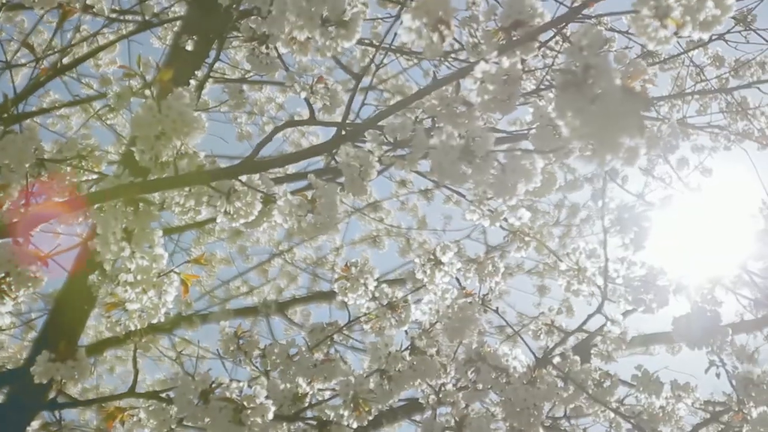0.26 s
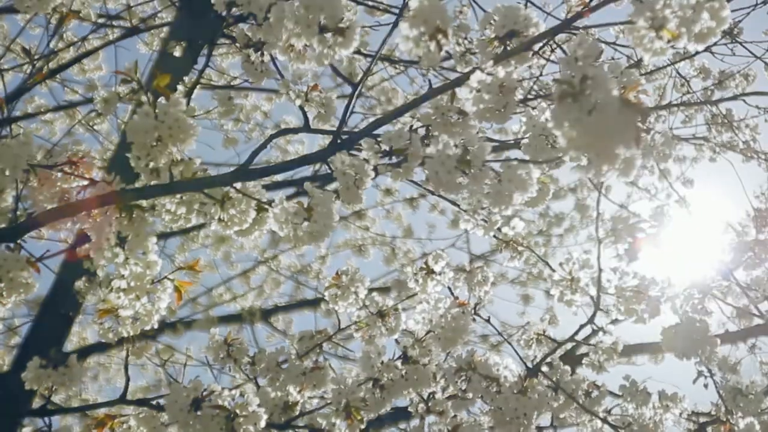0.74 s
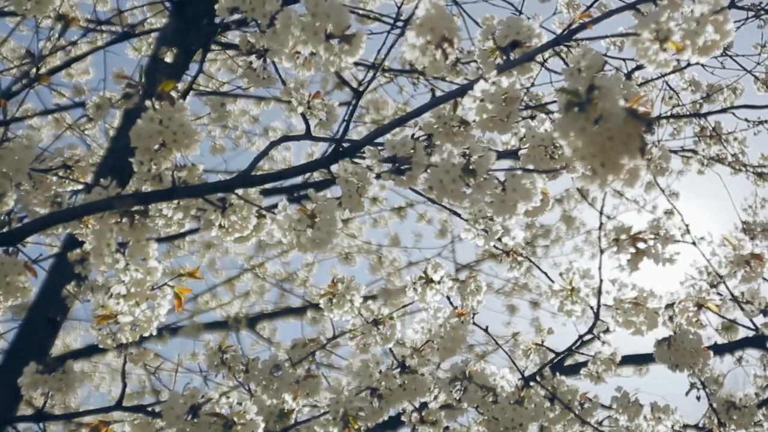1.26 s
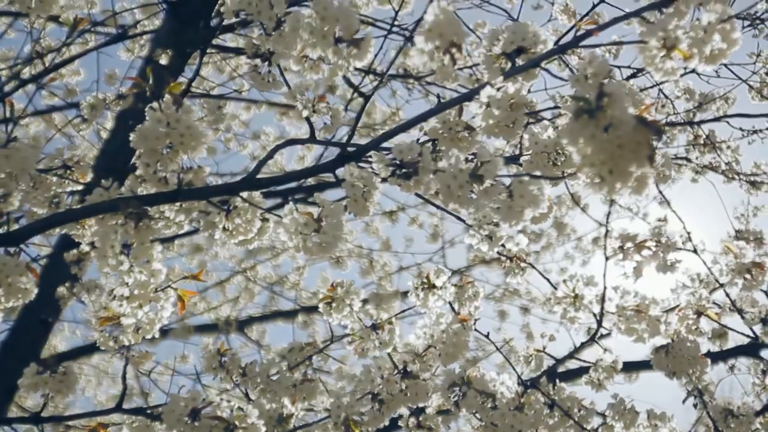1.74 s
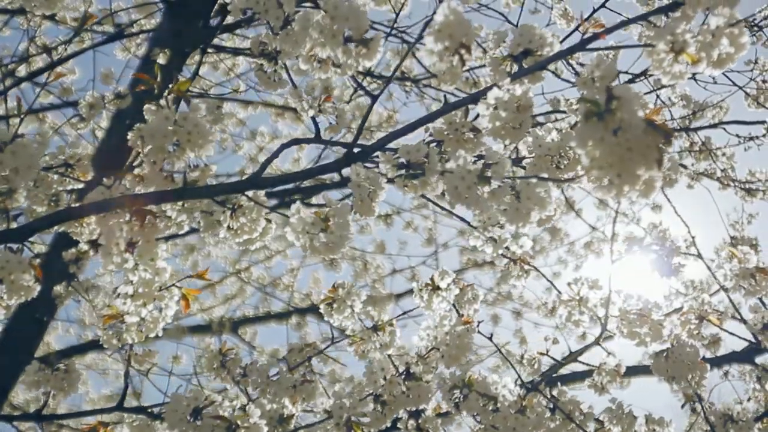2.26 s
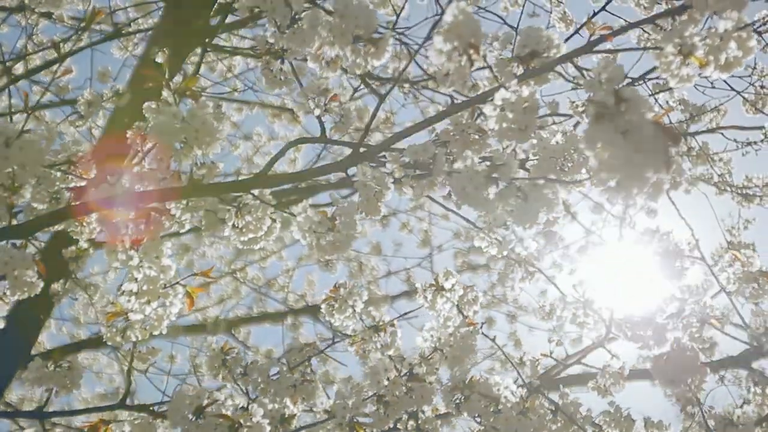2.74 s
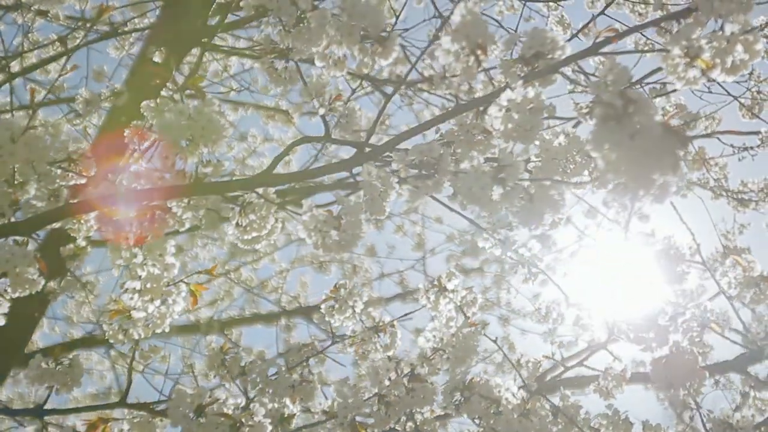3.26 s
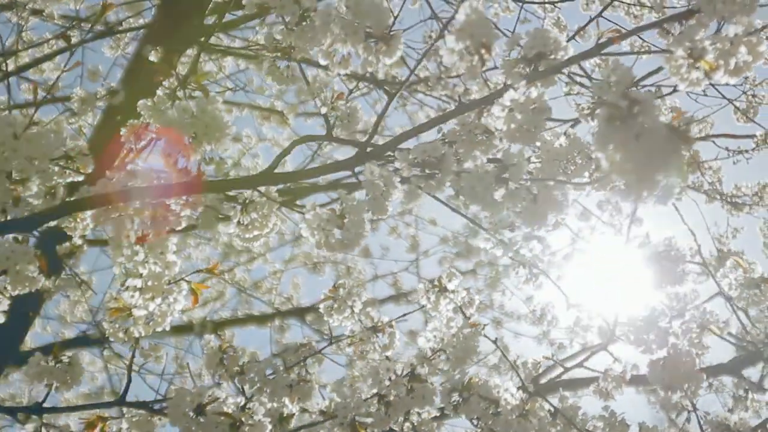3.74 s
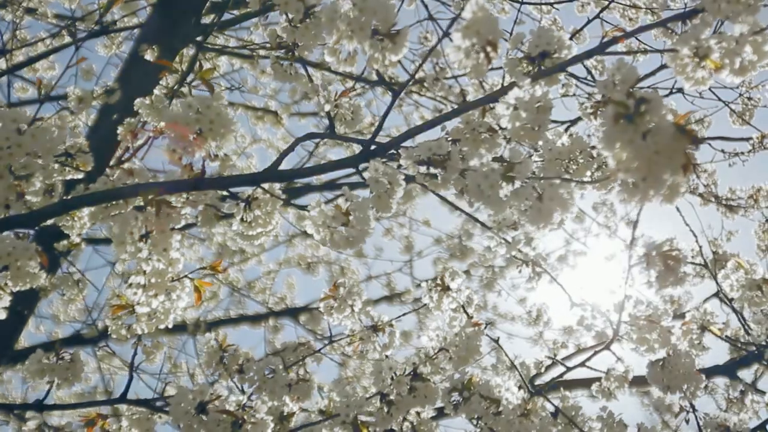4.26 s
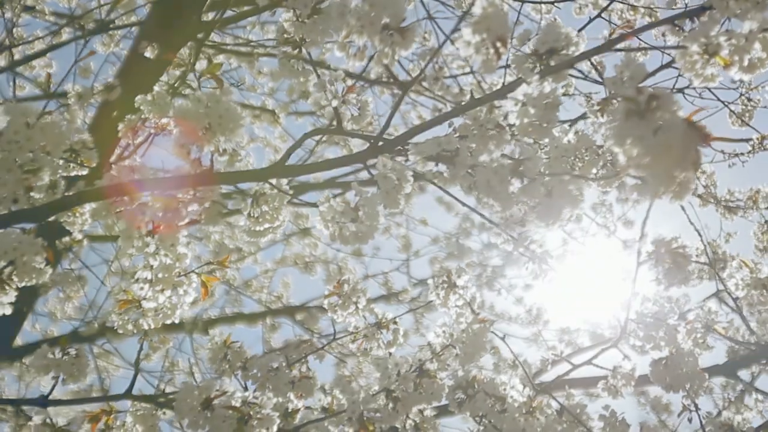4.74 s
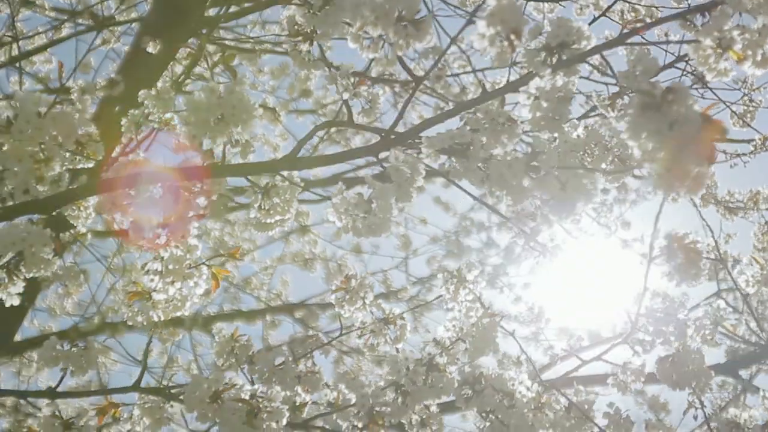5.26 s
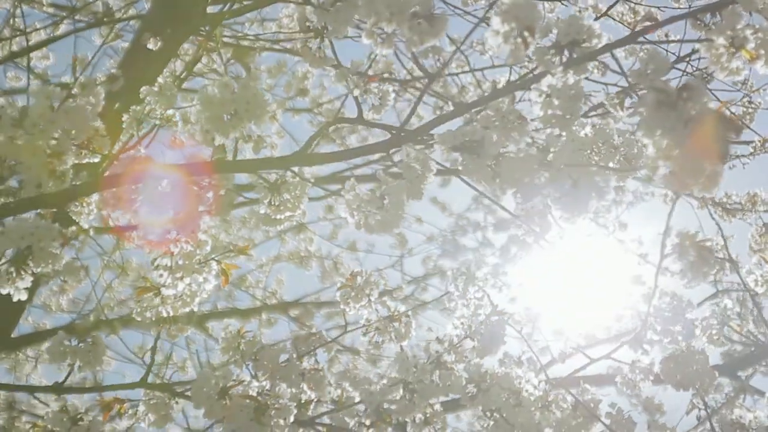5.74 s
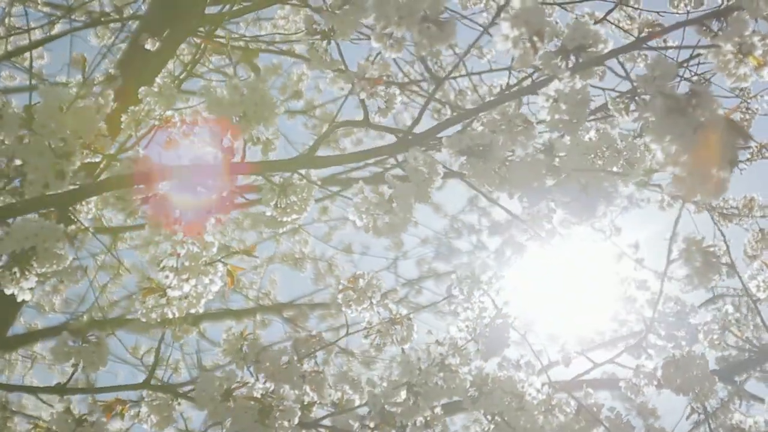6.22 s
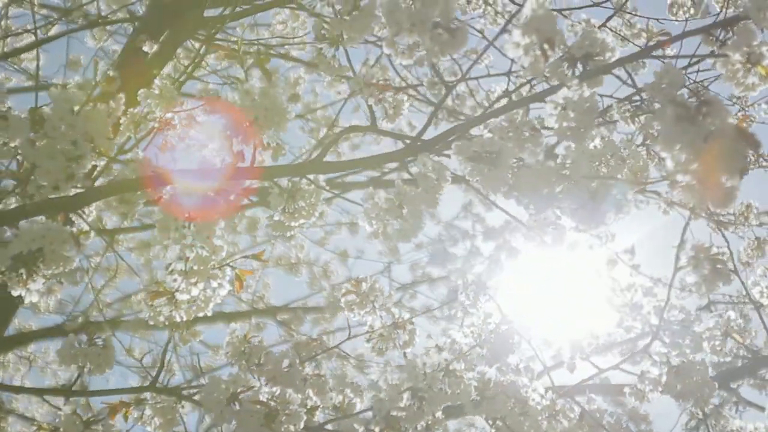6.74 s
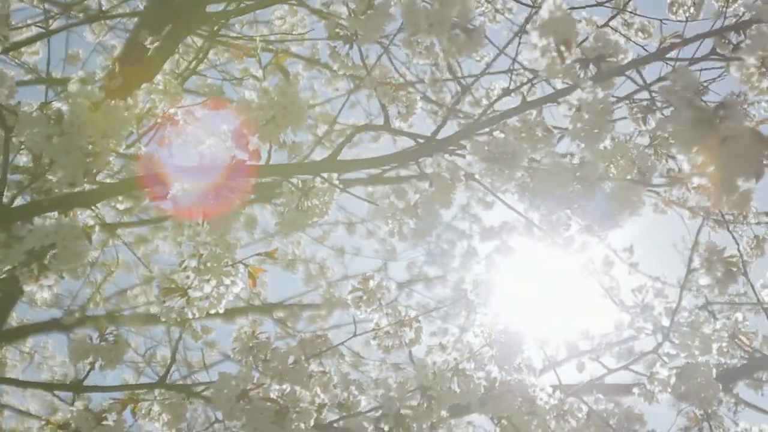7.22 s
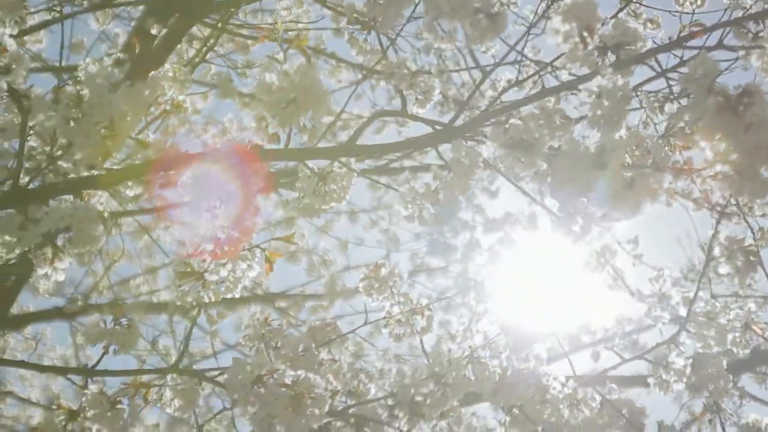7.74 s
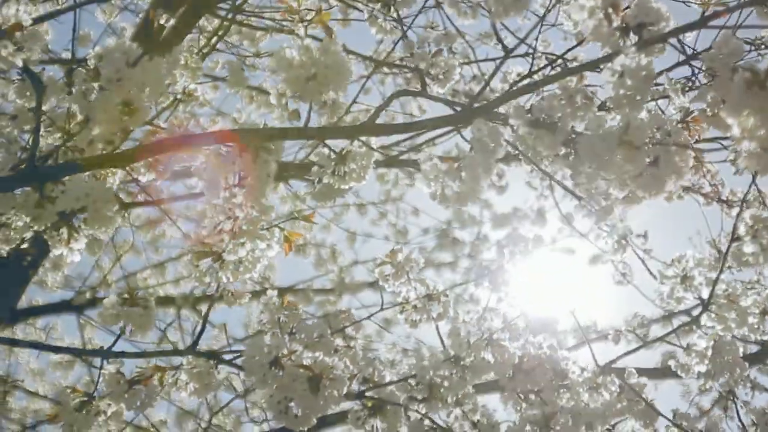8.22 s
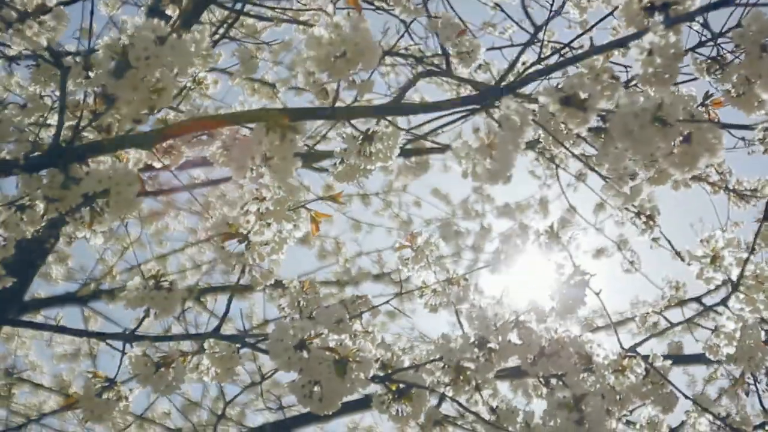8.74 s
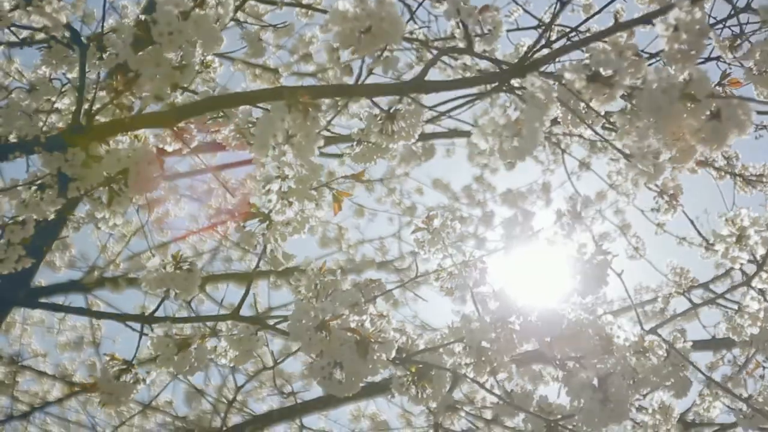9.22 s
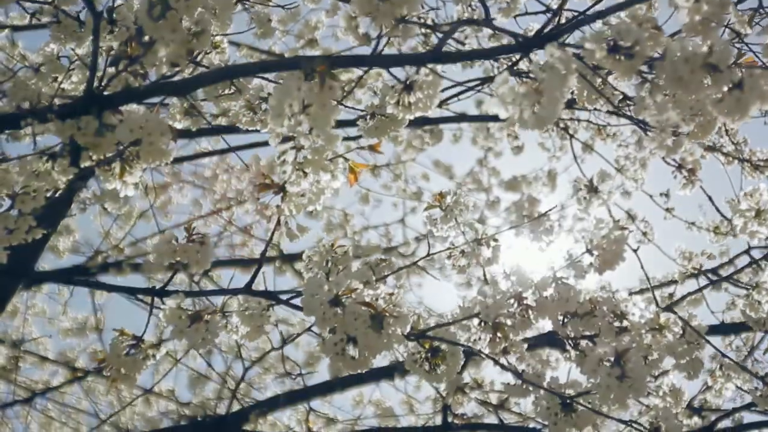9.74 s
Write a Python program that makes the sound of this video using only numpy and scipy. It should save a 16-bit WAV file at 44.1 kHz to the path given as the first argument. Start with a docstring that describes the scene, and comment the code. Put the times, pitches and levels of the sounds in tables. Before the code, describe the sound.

A nearby blackbird sings a fluted, warbling phrase while a tit and a sparrow call in a yard over a faint breeze.

```python
"""A yard between house walls, heard from a stereo microphone pair. In a nearby tree a blackbird sings
a fluted phrase with warbles, high twitter and a buzzy trill from both halves of its syrinx.
A tit repeats its two-note song, a sparrow chirps on the left, fainter songbirds answer further off.
Walls and foliage echo the whistled notes and two taps of a twig, over the noise of distant traffic
and a breeze in the leaves."""
import sys
import numpy as np
from scipy import signal
from scipy.fft import rfft, irfft, next_fast_len
from scipy.io import wavfile
from scipy.ndimage import uniform_filter1d

SR = 44100
rng = np.random.default_rng(int(sys.argv[2]) if len(sys.argv) > 2 else 0)


def transcribe(signal):
    """Save signal, clipped to [-1, 1], as a 16-bit WAV file at the path in sys.argv[1]."""
    frames = np.atleast_2d(signal).T
    limited = np.clip(frames, -1, 1)
    pcm = np.round(limited * 32767).astype(np.int16)
    wavfile.write(sys.argv[1], SR, pcm)


N = 440118
TOP_HZ = 15050


def undb(db):
    return 10 ** (np.asarray(db) / 20)


def span(start, length):
    return np.arange(int(start * SR), int((start + length) * SR)) / SR


def curve(points):
    """Straight lines through (t/s, value) points, over the whole scene."""
    return np.interp(np.arange(N) / SR, *np.transpose(points))


def walk(rate_hz):
    """Random values held for 1 / rate_hz and smoothed twice; spread near 1."""
    hold = int(SR / rate_hz)
    steps = np.repeat(rng.standard_normal(N // 256)[:N // hold + 1], hold)
    return 1.3 * uniform_filter1d(uniform_filter1d(steps, hold), hold)[:N]


RASP_HZ = 400
def add_whistle(out, t, hz, db, edge_s, overtones_db=()):
    """One tone of a syrinx, added at times t: a clean fundamental, raspy overtones, soft ends."""
    phase = 2 * np.pi * (np.cumsum(hz) / SR + rng.random())
    grain = int(SR / RASP_HZ)
    tone = np.sin(phase)
    for n, overtone_db in enumerate(overtones_db, start=2):
        noise = rng.standard_normal(SR * 6 // 10)[:len(t)]
        rasp = uniform_filter1d(.5 + np.sqrt(grain) * uniform_filter1d(noise, grain), grain // 2)
        top_fade = np.clip((TOP_HZ - n * hz) / 1500, 0, 1)
        tone += undb(overtone_db) * rasp * np.sin(n * phase) * top_fade
    ends = np.clip(np.minimum(t - t[0], t[-1] - t) / edge_s, 0, 1)
    at = np.round(t * SR).astype(int)
    inside = (at >= 0) & (at < N)
    out[at[inside]] += (tone * undb(db) * ends)[inside]


# Throat resonances that lift the overtones: f/Hz, width/Hz, lift/dB
THROAT = [(3300, 250, 14), (10700, 1000, 11), (12800, 700, 8)]
WAVER_SHARE, WAVER_DB, WAVER_HZ = .006, 2.2, 70  # held notes are never quite steady
MUSCLE_S, FULL_VOICE_DB = .005, -20
def sing(notes, events=((0, 0),), overtones_db=(), bend=None, retune=0., strain=0.):
    """A bird sings notes (t/s, f/Hz, level/dB) at each event (t/s, gain/dB); muscles round the turns."""
    out, waver, flutter = np.zeros(N), walk(WAVER_HZ), walk(WAVER_HZ)
    tunings = 1 + retune * rng.standard_normal(len(events))
    for (start, gain_db), tuning in zip(events, tunings):
        for note in notes:
            times, hz, db = np.transpose(note)
            length = times[-1] - times[0]
            t = span(start + times[0], length)
            now = np.clip((t * SR).astype(int), 0, N - 1)
            swing_hz, dip_db = bend(t) if bend else (0, 0)
            rounding = min(len(t) // 20, int(MUSCLE_S * SR)) + 1
            pitch = uniform_filter1d(np.interp(t - start, times, hz), rounding, mode="nearest")
            pitch = pitch * tuning * (1 + WAVER_SHARE * waver[now]) + swing_hz
            level_db = gain_db + dip_db + np.interp(t - start, times, db) + WAVER_DB * flutter[now]
            effort_db = strain * (level_db - FULL_VOICE_DB)  # under strain, louder is brighter
            voiced_db = []
            for n, overtone_db in enumerate(overtones_db, start=2):
                lift_db = sum(lift * np.exp(-((n * pitch - f) / width) ** 2) for f, width, lift in THROAT)
                voiced_db.append(overtone_db + effort_db + lift_db)
            add_whistle(out, t, pitch, level_db, edge_s=.002 + .015 * length, overtones_db=voiced_db)
    return out


# Distant traffic and leaves all round the microphones: f/Hz, relative spectral level/dB
AIR_SPECTRUM = [(18, -44), (30, -29), (64, -21), (125, -15.5), (205, -9), (300, -4), (600, -2.5),
                (900, -2.5), (1300, -7), (2200, -12.5), (5000, -17.5), (13500, -24.5), (15000, -33)]
# How alike the two microphones hear them: f/Hz, correlation from -1 to 1
AIR_LIKENESS = [(30, .55), (70, .93), (130, .99), (290, .992), (640, .87), (1400, .5), (3090, -.08),
                (6790, -.22), (14900, -.12)]
# The breeze lifts the leaf hiss: t/s, gain/dB
BREEZE = [(0, 1), (1.5, 0), (3, 0), (5, 1), (7, 0), (8.4, 0), (8.9, 3), (9.4, 2), (9.98, 1)]
# The traffic swells in the deep bass: t/s, gain/dB
TRAFFIC_SWELLS = [(0, 0), (3.5, 0), (4.5, 4), (6, 4), (6.6, -1), (8.2, -2), (8.8, 3), (9.4, 0), (9.98, 0)]
AIR_DB, LEAVES_FROM_HZ, RUMBLE_BELOW_HZ = -55.5, 2500, 110
def traffic_and_leaves():
    """Two-octave bands of noise that swell together and flicker alone; alike on both sides in the bass."""
    size = next_fast_len(N)
    hz = np.maximum(np.fft.rfftfreq(size, 1 / SR), 1)
    likeness, colour_db = (np.interp(np.log(hz), np.log(f), value)
                           for f, value in map(np.transpose, (AIR_LIKENESS, AIR_SPECTRUM)))
    mid, side = rfft(rng.standard_normal((2, size))) * undb(colour_db) * np.sqrt([1 + likeness, 1 - likeness])
    pair = np.array([mid + side, mid - side])
    gust_db, rumble_db, swell_db = curve(BREEZE), curve(TRAFFIC_SWELLS), .48 * walk(.5)
    out = 0
    for centre_hz in 20 * 4 ** np.arange(6):
        share = np.cos(np.pi / 2 * np.clip(np.log2(hz / centre_hz) / 2, -1, 1)) ** 2
        band = irfft(pair * share, size)[:, :N]
        leafy = min(centre_hz / LEAVES_FROM_HZ, 1)
        deep = min(RUMBLE_BELOW_HZ / centre_hz, 1) ** 2
        out = out + band * undb(swell_db + walk(2.97) + leafy * gust_db + deep * rumble_db)
    return out * undb(AIR_DB) / np.sqrt(np.mean(irfft(mid, size) ** 2))


# A faint drone, far off: t/s, level/dB
DRONE_LEVELS = [(0, -68), (.3, -72), (.7, -66), (1.1, -68), (1.5, -85)]
def drone(centre_hz=1350, width_hz=250):
    """A narrow band of noise that soon sinks to almost nothing."""
    edges = [centre_hz - width_hz / 2, centre_hz + width_hz / 2]
    band = signal.butter(2, edges, "band", fs=SR, output="sos")
    hum = signal.sosfilt(band, rng.standard_normal(N))
    return hum / hum.std() * undb(curve(DRONE_LEVELS))


# A neighbouring bird's blips, low rise and slide, one list a note: t/s into the call, f/Hz, level/dB
CHATTER_NOTES = [
    [(-.001, 4150, -1), (.003, 4800, 5), (.006, 5550, -2)],
    [(.008, 4900, -6), (.014, 5100, 0), (.024, 5200, -10)],
    [(.012, 2000, -8), (.018, 2550, -5), (.028, 2780, -4), (.036, 2800, -8)],
    [(.033, 7450, -8), (.039, 7050, -4), (.044, 6100, 3), (.05, 5150, -3), (.054, 4900, -7)],
]
# Its calls: t/s, gain/dB
CHATTER_CALLS = [(-.041, -40), (.056, -39), (.153, -38.5)]
def chatter():
    """Three quick calls of overlapping whistles, ending just after the scene opens."""
    return sing(CHATTER_NOTES, CHATTER_CALLS, overtones_db=[-31])


CHIRP_FROM_HZ, KINK_HZ, LEAD_IN_S = 3450, 3550, .013
def chirp(t, db, rise_s, top_hz, kink_db):
    """A sparrow's note: faint lead-in, sudden loud upward sweep, then a drop and a second quick rise."""
    return [(t - rise_s - LEAD_IN_S, CHIRP_FROM_HZ, db - 24),
            (t - rise_s, CHIRP_FROM_HZ + 50, db - 16), (t - .8 * rise_s, CHIRP_FROM_HZ + 150, db - 8),
            (t - .35 * rise_s, .92 * top_hz, db), (t, top_hz, db - 4),
            (t + .004, KINK_HZ, db + kink_db), (t + .009, .93 * top_hz, db + kink_db),
            (t + .014, 1.04 * top_hz, db + kink_db - 8)]


# Sparrow chirps: top of the sweep t/s, level/dB, sweep length/s, top f/Hz, relative kink level/dB
SPARROW_CHIRPS = [(0.084, -39, .03, 4200, -6), (.69, -70, .025, 4350, -6), (.977, -30.5, .027, 4400, -8),
                  (1.118, -31, .022, 4400, -4), (1.945, -68, .025, 4350, -6), (2.581, -42, .025, 4350, -6),
                  (2.717, -30.5, .024, 4400, -6), (3.209, -64, .025, 4350, -6),
                  (4.129, -29.5, .022, 4450, -6), (4.258, -24, .028, 4450, -5),
                  (5.595, -50, .025, 4350, -6), (5.765, -27.5, .026, 4350, -6),
                  (5.888, -25, .024, 4350, -6), (6.85, -62, .025, 4350, -6), (7.0, -66, .025, 4350, -6),
                  (8.527, -30.5, .032, 4500, -4), (8.662, -32, .029, 4350, -2),
                  (9.495, -63, .025, 4350, -6), (9.622, -36, .025, 4350, -6)]
# One drawn-out call, left of the microphones: t/s, f/Hz, level/dB
SPARROW_LONG_CALL = [
    [(7.035, 2910, -61), (7.065, 2736, -50.5), (7.12, 2924, -47), (7.165, 3000, -46), (7.18, 2990, -36.5),
     (7.215, 3430, -26.5), (7.24, 4195, -23.5), (7.25, 4230, -30)],
]
DISTANT_BELOW_DB = -55  # fainter chirps come from behind the trees
def sparrows():
    """Swept whistles as two signals: the near chirps with the long call, and the distant chirps."""
    near = sing([chirp(*row) for row in SPARROW_CHIRPS if row[1] > DISTANT_BELOW_DB])
    distant = sing([chirp(*row) for row in SPARROW_CHIRPS if row[1] <= DISTANT_BELOW_DB])
    return near + sing(SPARROW_LONG_CALL, overtones_db=[-46, -38]), distant


# Songbirds far from the microphones; all levels are before FAR_DB.
# Plain whistles: t/s, length/s, start f/Hz, end f/Hz, level/dB
FAR_WHISTLES = [(1.64, .07, 2220, 2200, -64), (1.74, .1, 2600, 2460, -67), (7.26, .06, 4900, 5050, -60),
                (9.378, .024, 3320, 2980, -54), (9.61, .055, 2850, 3350, -62)]
# Stepped rises: middle step t/s, low step length/s, low f/Hz, middle f/Hz, top f/Hz, level/dB
FAR_STAIRS = [(7.645, .02, 3920, 4960, 5720, -49), (7.9, .045, 3330, 4530, 5300, -49)]
# Arched whistles: crest t/s, start f/Hz, crest f/Hz, end f/Hz, fall length/s, level/dB
FAR_ARCHES = [(8.065, 3730, 4140, 2610, .085, -52), (8.27, 3300, 4070, 3070, .07, -50),
              (8.455, 3250, 3980, 3090, .065, -51)]
# A two-note motif and a scooped one, one list a note: t/s into the motif, f/Hz, level/dB
PAIR_NOTES = [
    [(0, 4860, -8), (.03, 5230, 0)],
    [(.065, 4550, 0), (.09, 3900, -1)],
]
SCOOP_NOTES = [
    [(0, 2850, -7), (.04, 2630, -3), (.06, 2750, -10), (.075, 3220, -2), (.095, 3320, -3)],
]
# Their calls: t/s, gain/dB
PAIR_CALLS = [(7.03, -60), (7.41, -51)]
SCOOP_CALLS = [(8.76, -59), (8.905, -57), (9.05, -57), (9.205, -58)]
FAR_DB, STAIR_JUMP_S, STAIR_HOLD_S, ARCH_RISE_S = -1, .021, .024, .033
def far_birds():
    """Pure whistles without overtones: stepped rises, arches, plain glides and repeated motifs."""
    notes = [[(t - STAIR_JUMP_S - low_s, 1.03 * low, db - 8), (t - STAIR_JUMP_S, low, db - 2),
              (t, mid, db), (t + STAIR_HOLD_S, mid, db - 3),
              (t + STAIR_HOLD_S + STAIR_JUMP_S, top, db - 10)]
             for t, low_s, low, mid, top, db in FAR_STAIRS]
    arc = np.linspace(-1, 1, 9)  # 0 at the crest
    for t, start_hz, crest_hz, end_hz, fall_s, db in FAR_ARCHES:
        times = t + arc * np.where(arc < 0, ARCH_RISE_S, fall_s)
        hz = crest_hz - np.abs(arc) ** 1.6 * (crest_hz - np.where(arc < 0, start_hz, end_hz))
        notes.append(np.transpose([times, hz, db - 6 * np.abs(arc)]))
    notes += [[(t, start_hz, db), (t + length, end_hz, db)]
              for t, length, start_hz, end_hz, db in FAR_WHISTLES]
    song = sing(notes) + sing(PAIR_NOTES, PAIR_CALLS) + sing(SCOOP_NOTES, SCOOP_CALLS, retune=.01)
    return undb(FAR_DB) * song


# Twigs tap in the breeze, across the yard: t/s, gain/dB
TWIG_TAPS = [(2.122, -48), (7.184, -32)]
# A twig's resonances: f/Hz, level/dB, t60/s
TWIG_MODES = [(670, -8, .04), (1500, -3, .02), (5000, -5, .012)]
def twigs():
    """Dry taps: a crack of contact and the brief ring of the wood."""
    out, age = np.zeros(N), span(0, .1)
    ring = sum(undb(db - 60 * age / t60) * np.sin(2 * np.pi * hz * age) for hz, db, t60 in TWIG_MODES)
    crack = undb(-8 - 60 * age / .02) * uniform_filter1d(rng.standard_normal(len(age)), size=3)
    tap = (ring + crack) * np.clip(age / .001, 0, 1)
    for t, db in TWIG_TAPS:
        out[int(t * SR):int(t * SR) + len(age)] += undb(db) * tap
    return out


# The tit, a little left of centre, one list a note: t/s into the call, f/Hz, level/dB
TIT_BLIP_AND_SLIDE = [
    [(0, 5730, -22), (.008, 6330, -5), (.019, 6380, -14)],
    [(.008, 8450, -16), (.022, 6980, -3.5), (.038, 5850, -1), (.058, 5270, 1), (.088, 5040, -1.5),
     (.125, 4955, -1)],
]
TIT_UPTURN = [
    [(0, 5000, -3), (.008, 5300, 0), (.016, 6000, -8)],
]
TIT_TICK_AND_LOW = [
    [(0, 7300, -24), (.003, 6100, -14), (.006, 4300, -20)],
    [(.031, 3090, -14), (.048, 3680, -10), (.058, 3980, -5), (.068, 4140, -2), (.101, 4175, 0.5),
     (.151, 4140, -6), (.21, 4070, -15)],
]
# Its high calls: t/s, gain/dB, time stretch of the slide (under 1 falls sooner)
TIT_HIGH_CALLS = [(3.272, -33.5, 1.0), (3.781, -32, .92), (4.269, -31, .82), (4.763, -33, .82),
                  (9.858, -35, .95)]
# Its upturns and low calls: t/s, gain/dB
TIT_UPTURN_CALLS = [(3.9, -37), (4.388, -33), (4.882, -35)]
TIT_LOW_CALLS = [(3.498, -30), (3.985, -30), (4.483, -31.5), (4.986, -35.5)]
def tit():
    """A high falling whistle, sometimes turned up at the end, alternates with a tick and a low one."""
    blip, slide = TIT_BLIP_AND_SLIDE
    high = 0
    for start, gain_db, stretch in TIT_HIGH_CALLS:
        paced = [(t * stretch, hz, db) for t, hz, db in slide[:-1]] + slide[-1:]
        high = high + sing([blip, paced], [(start, gain_db)], overtones_db=[-39], retune=.004)
    upturns = sing(TIT_UPTURN, TIT_UPTURN_CALLS)
    return high + upturns + sing(TIT_TICK_AND_LOW, TIT_LOW_CALLS, overtones_db=[-42], retune=.004)


# The blackbird in its tree, near and almost centred, one list a note: t/s, f/Hz, level/dB
FLUTE_NOTES = [
    [(3.535, 1532, -52), (3.548, 1575, -45), (3.581, 1636, -37), (3.601, 1802, -33), (3.616, 1960, -32),
     (3.64, 2060, -29), (3.648, 2130, -31)],
    [(3.73, 2040, -45), (3.754, 2076, -33), (3.784, 1792, -27), (3.804, 1641, -30), (3.86, 1625, -30),
     (3.9, 1660, -28), (3.945, 1665, -28)],
    [(4.05, 1900, -46), (4.062, 2070, -29), (4.068, 2125, -22), (4.105, 2052, -21), (4.17, 2060, -18),
     (4.226, 2075, -21), (4.24, 1780, -30)],
    [(4.362, 2860, -44), (4.368, 2915, -38), (4.382, 2915, -36), (4.394, 2745, -27), (4.408, 2617, -22),
     (4.43, 2534, -20), (4.464, 2500, -21), (4.485, 2370, -21), (4.516, 2300, -19), (4.535, 2160, -23),
     (4.56, 2300, -22), (4.605, 2450, -20), (4.66, 2720, -22), (4.703, 2820, -23), (4.738, 2530, -24),
     (4.76, 2530, -22), (4.79, 2450, -21), (4.845, 2452, -22), (4.858, 2430, -30)],
    [(5.0, 2480, -42), (5.012, 2640, -29), (5.03, 2700, -27), (5.048, 2592, -19), (5.084, 2410, -22),
     (5.105, 2405, -21), (5.128, 2300, -19), (5.15, 2238, -20), (5.17, 2040, -25), (5.19, 2040, -24),
     (5.215, 2170, -26), (5.235, 2400, -24), (5.265, 2440, -22), (5.3, 2600, -24), (5.335, 2650, -24),
     (5.39, 2660, -36)],
]
# Harmonics 2 to 6, before strain and throat resonance: relative level/dB
FLUTE_OVERTONES_DB = [-38, -46, -41, -43, -50]
# A downward flick: t/s into the flick, f/Hz, level/dB
FLICK_NOTE = [
    [(0, 2420, 0), (.007, 2200, -3), (.013, 1750, -12)],
]
# Where it cuts off the longest whistle: t/s, gain/dB
FLICK_CALLS = [(4.859, -25)]
def blackbird_flute():
    """Five fluted whistles whose overtones grow with effort; two of them warble."""
    whistles = sing(FLUTE_NOTES, overtones_db=FLUTE_OVERTONES_DB, bend=warble, strain=.4)
    return whistles + sing(FLICK_NOTE, FLICK_CALLS)


# Throat pulses inside two whistles: list of pitch crests t/s, first swing/Hz, last swing/Hz
WARBLES = [([4.545, 4.571, 4.597, 4.624, 4.651, 4.677, 4.703, 4.727], 215, 200),
           ([5.201, 5.227, 5.254, 5.284, 5.31, 5.332, 5.356, 5.381], 280, 90)]
WARBLE_SKEW, WARBLE_DIP_DB = .22, -6
def warble(t):
    """Pitch swing/Hz and level dip/dB of the pulsing throat; the voice thins on each rise."""
    swing_hz, dip_db = 0, 0
    for crests, first_hz, last_hz in WARBLES:
        beat = np.mean(np.diff(crests))
        count = np.interp(t, [crests[0] - beat, *crests, crests[-1] + beat], np.arange(-1, len(crests) + 1))
        fade = np.clip(2 * np.minimum(count + .5, len(crests) - .5 - count), 0, 1)
        turn = 2 * np.pi * count - np.arctan(2 * WARBLE_SKEW) / 2
        depth_hz = np.interp(t, [crests[0], crests[-1]], [first_hz, last_hz])
        swing_hz = swing_hz + depth_hz * fade * (np.cos(turn) - WARBLE_SKEW * np.sin(2 * turn))
        dip_db = dip_db + WARBLE_DIP_DB * fade * np.clip(-np.sin(turn), 0, 1) ** 4
    return swing_hz, dip_db


# Twitter from the same perch: t/s into the note, f/Hz, level/dB
TWITTER_SLIDE = [
    [(0, 8050, -20), (.015, 7900, -5), (.026, 6950, 0), (.036, 6620, -1)],
]
TWITTER_DROP = [
    [(0, 6350, -5), (.008, 6050, 0), (.02, 5750, -3)],
]
def blackbird_twitter():
    """A steep high slide and a short lower one, twice over."""
    slides = sing(TWITTER_SLIDE, events=[(5.527, -28), (5.739, -25)], overtones_db=[-19])
    drops = sing(TWITTER_DROP, events=[(5.658, -36), (5.876, -34)], overtones_db=[-19])
    return slides + drops


# The trill from the same perch: t/s, upper length/s, upper start f/Hz, upper end f/Hz,
# upper level/dB, lower end f/Hz, lower level/dB
TRILL_NOTES = [(5.951, .025, 4550, 4500, -28, 1880, -38), (6.009, .034, 4000, 3950, -28, 1980, -39),
               (6.063, .022, 4000, 3900, -29, 2000, -36), (6.112, .026, 3900, 3850, -31, 2020, -36),
               (6.163, .028, 3900, 3900, -30, 2060, -35), (6.22, .035, 4000, 4100, -30, 2060, -35),
               (6.277, .07, 4200, 4550, -31, 2490, -37)]
# The two voices mix into sum tones: multiple of upper, multiple of lower, relative level/dB
SUM_TONES = [(1, 1, -4), (1, 2, -17), (2, 1, -20), (2, 2, -27)]
BUZZ_HZ, BUZZ_SWING_HZ, BUZZ_FADE_S = 112, 480, .04
HOARSE_HZ, BUZZ_DIES_DB_PER_S = 80, 70  # at full swing
def blackbird_trill():
    """Both halves of the syrinx at once: a hoarse, fluttering upper voice over a steadier lower one."""
    out, wobble, hoarse = np.zeros(N), walk(BUZZ_HZ), walk(150)

    def two_voices(start, up_s, up_from_hz, up_to_hz, up_db, low_to_hz, low_db,
                   low_s, low_from_hz=2180, low_delay_s=0, swing_hz=BUZZ_SWING_HZ):
        t = span(start, max(up_s, low_delay_s + low_s))
        age, now = t - start, (t * SR).astype(int)
        buzz = swing_hz / BUZZ_SWING_HZ
        turn = 2 * np.pi * BUZZ_HZ * age + .9 * wobble[now]  # the flutter is uneven
        upper_hz = up_to_hz + (up_from_hz - up_to_hz) * np.exp(-3 * age / up_s)
        upper_hz += swing_hz * np.exp(-age / BUZZ_FADE_S) * np.cos(turn) + HOARSE_HZ * buzz * hoarse[now]
        throb_db = 4 * buzz * np.sin(turn)
        upper_db = up_db + throb_db - BUZZ_DIES_DB_PER_S * buzz ** 2 * age
        done = np.clip((age - low_delay_s) / low_s, 0, 1)
        glide = np.exp(-3 * done) if low_to_hz < low_from_hz else 1 - done ** 1.5  # falls early, rises late
        lower_hz = low_to_hz + (low_from_hz - low_to_hz) * glide
        lower_hz += .55 * swing_hz * np.exp(-2.2 * age / BUZZ_FADE_S) * np.cos(turn)  # shaken at first
        lower_db = low_db - 8 * np.exp(-3 * done)  # grows into the note
        up, low = age < up_s, (age >= low_delay_s) & (age < low_delay_s + low_s)
        add_whistle(out, t[up], upper_hz[up], upper_db[up], edge_s=.003, overtones_db=[-23, -32])
        add_whistle(out, t[low], lower_hz[low], lower_db[low], edge_s=.008,
                    overtones_db=[-9, -22, -26, -30])
        both = up & low
        mix_db = (up_db + low_db) / 2 - 8 * buzz  # the buzz weakens the sum tones
        for m, n, db in SUM_TONES:
            add_whistle(out, t[both], (m * upper_hz + n * lower_hz)[both], mix_db + db, edge_s=.006)

    for start, up_s, *voices in TRILL_NOTES:
        two_voices(start, up_s, *voices, low_s=max(up_s, .039))
    for start in (6.375, 6.478):  # two softer rising notes close the trill
        two_voices(start, up_s=.075, up_from_hz=3700, up_to_hz=4300, up_db=-40, low_to_hz=2580,
                   low_db=-41, low_s=.06, low_from_hz=2410, low_delay_s=.022, swing_hz=220)
    return out


NEAR_ECHO_S, WALL_ECHO_S, WALL_ABOVE_HZ = .013, .049, 5500
SCATTER_LIKENESS, LEAF_TILT = .12, .5
def yard(sound, pan_db, lag_s, foliage_db, t60, near_db, wall_db):
    """The way to the microphones: direct sound, dense scatter from foliage, two smeared wall echoes."""
    age = span(0, .6)

    def echo(shape, db):
        noise = rng.standard_normal((3, len(age)))  # shared, left, right
        paths = np.sqrt(SCATTER_LIKENESS) * noise[0] + np.sqrt(1 - SCATTER_LIKENESS) * noise[1:]
        return undb(db) * paths * shape / np.sqrt(np.sum(shape ** 2))

    foliage = echo(undb(-60 * age / t60) * np.clip(age / .004, 0, 1), foliage_db)
    near_wall = echo(np.exp(-np.abs(age - NEAR_ECHO_S) / .0004), near_db)
    far_wall = echo(np.exp(-np.abs(age - WALL_ECHO_S) / .0004), wall_db)
    treble_only = signal.butter(2, WALL_ABOVE_HZ, "high", fs=SR, output="sos")
    sides_db = np.array([[pan_db], [-pan_db]]) / 2
    response = (foliage + near_wall + signal.sosfilt(treble_only, far_wall)) * undb(.32 * sides_db)
    response = signal.lfilter([1, -LEAF_TILT], [.6], response)  # leaves scatter treble more than bass
    taps = np.arange(32) - 8
    response[:, :len(taps)] += undb(sides_db) * np.sinc([taps - lag_s * SR, taps])  # direct sound
    return signal.fftconvolve(sound[None], response, axes=1)[:, :N]


# Each perch as the microphones hear it: left minus right/dB, left lag/s, foliage level/dB,
# foliage t60/s, near wall level/dB, far wall level/dB (echo levels before filtering)
NEIGHBOUR_AT = (1.0, 0.0000, 1.5, .25, -10, -24)
SPARROW_AT = (8.0, 0.00005, -2.5, .3, -12, -20)
BEHIND_TREES_AT = (2.0, 0.0000, 9, .3, -4, -8)
FAR_AT = (-3.0, 0.0000, 0, .4, -10, -14)
TIT_AT = (4.0, 0.00001, -1.5, .33, -16, -18)
BLACKBIRD_AT = (-1.5, 0.0000, -3.5, .38, -13, -8)
def scene():
    """Every source from its place in the yard, over traffic and leaves."""
    near_sparrow, distant_sparrow = sparrows()
    blackbird = blackbird_twitter() + blackbird_flute() + blackbird_trill()
    return (yard(blackbird, *BLACKBIRD_AT) + yard(tit(), *TIT_AT)
            + yard(near_sparrow, *SPARROW_AT) + yard(distant_sparrow, *BEHIND_TREES_AT)
            + yard(chatter(), *NEIGHBOUR_AT) + yard(far_birds() + twigs() + drone(), *FAR_AT)
            + traffic_and_leaves())


def record(dry):
    """The recorder cuts the treble steeply above TOP_HZ."""
    return signal.sosfilt(signal.ellip(10, .2, 70, TOP_HZ, fs=SR, output="sos"), dry)


dry = scene()
out = record(dry)
transcribe(out)
```